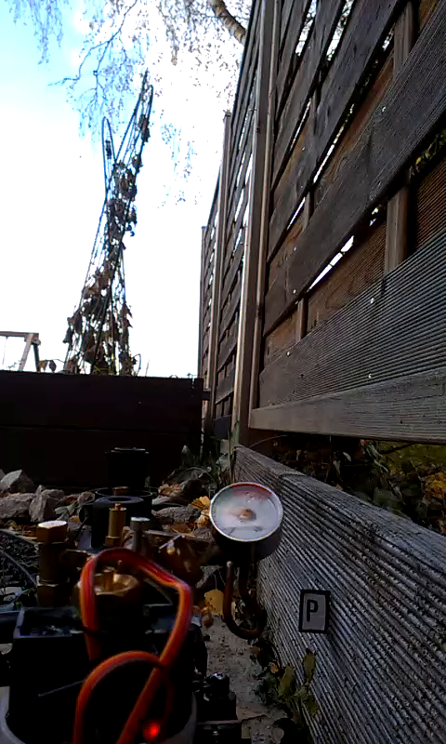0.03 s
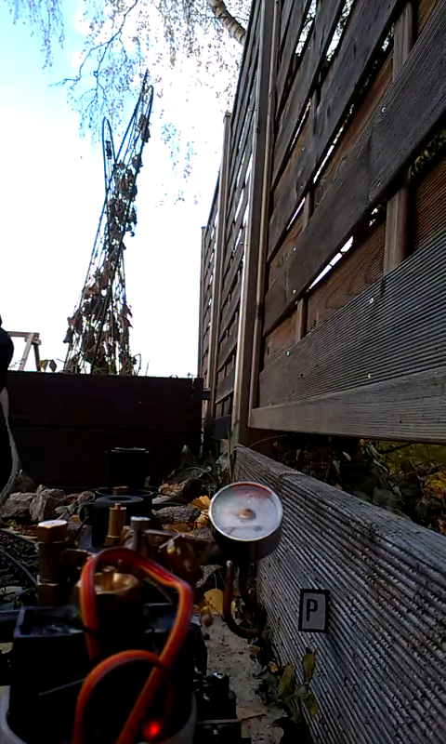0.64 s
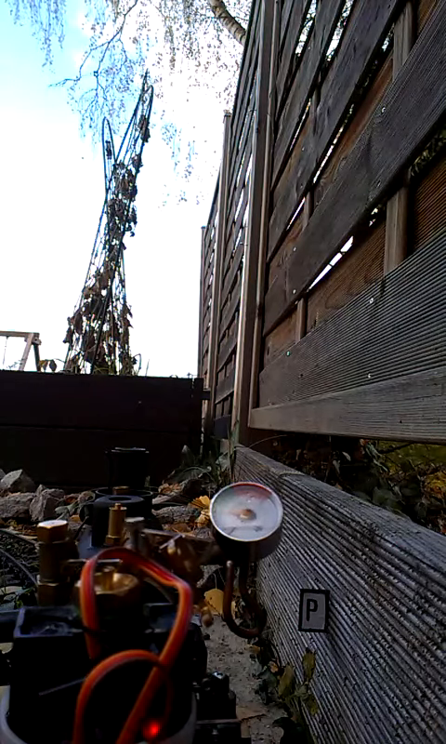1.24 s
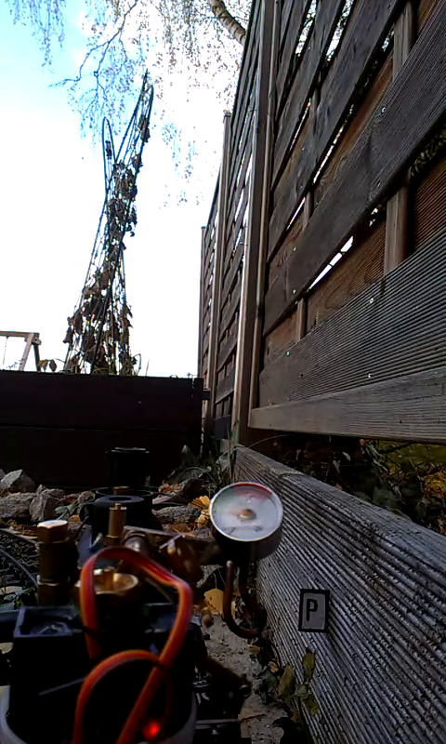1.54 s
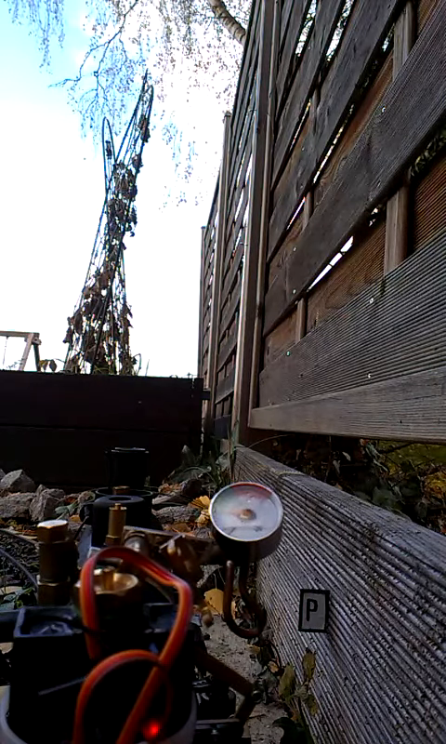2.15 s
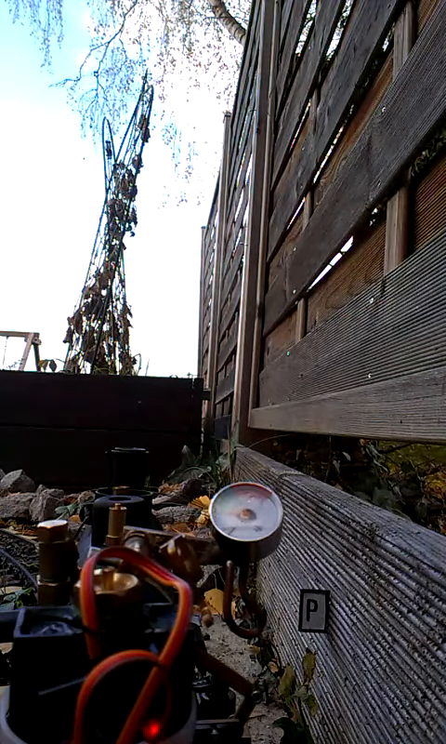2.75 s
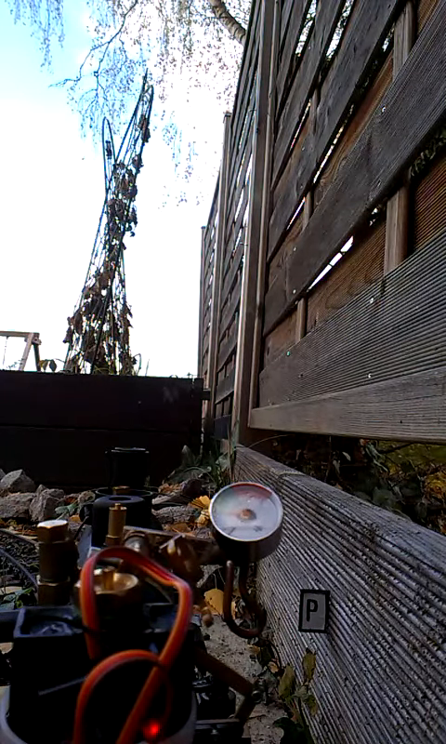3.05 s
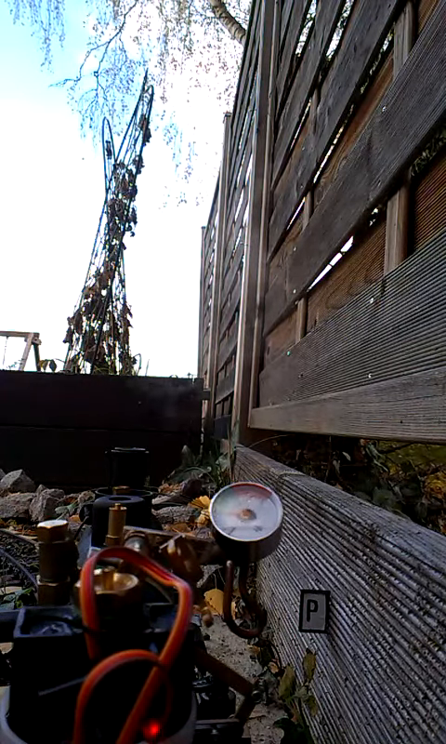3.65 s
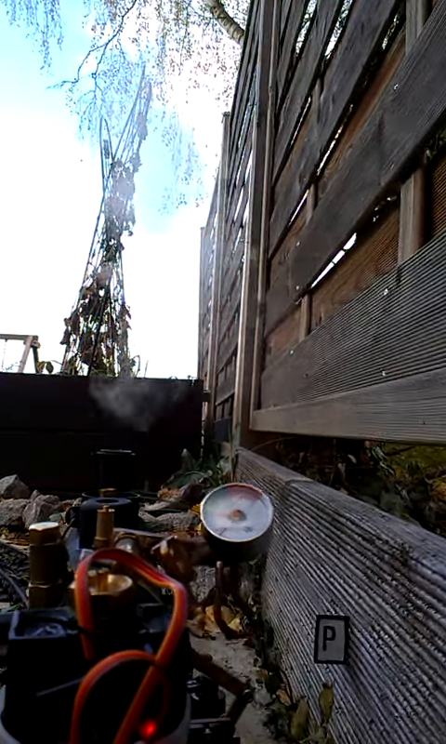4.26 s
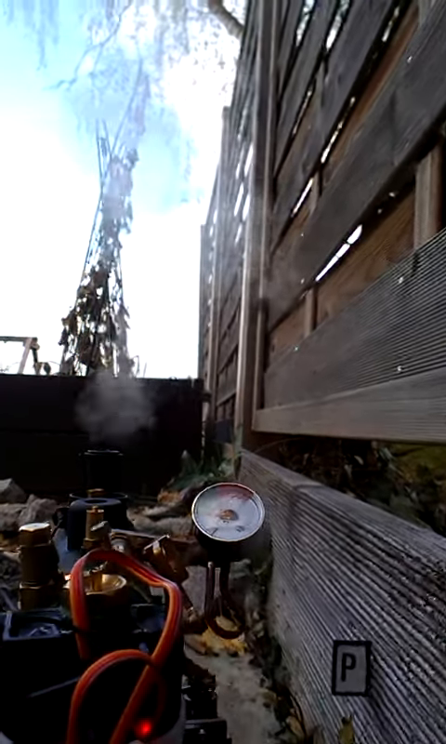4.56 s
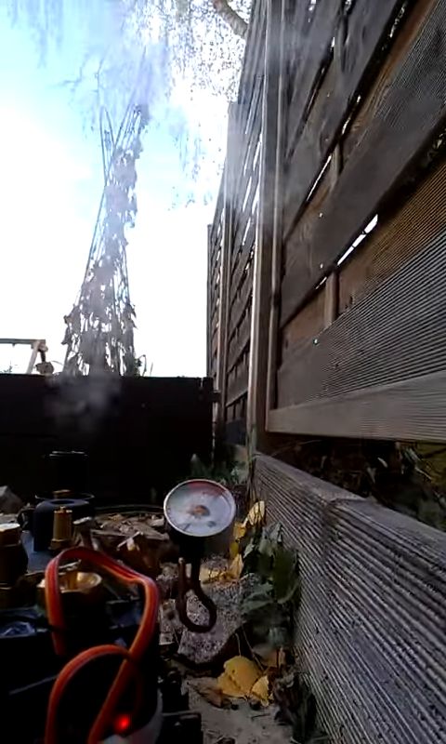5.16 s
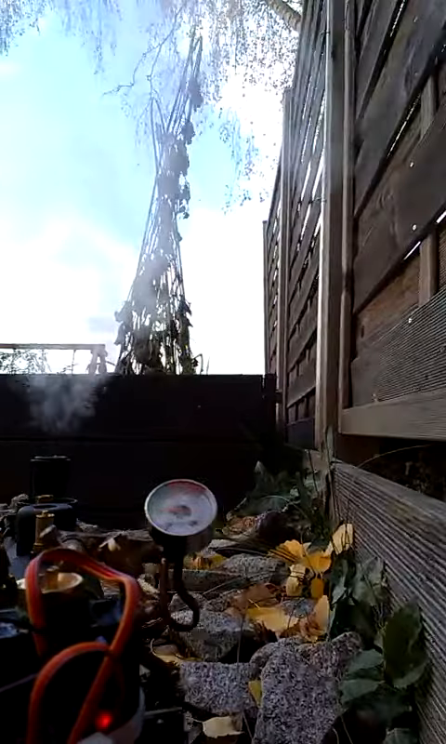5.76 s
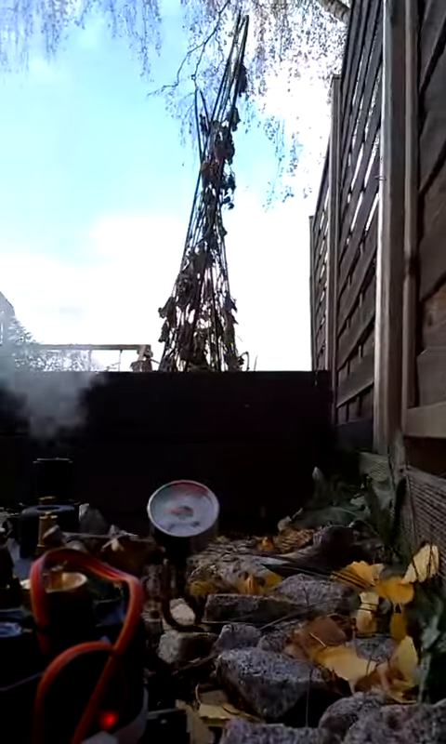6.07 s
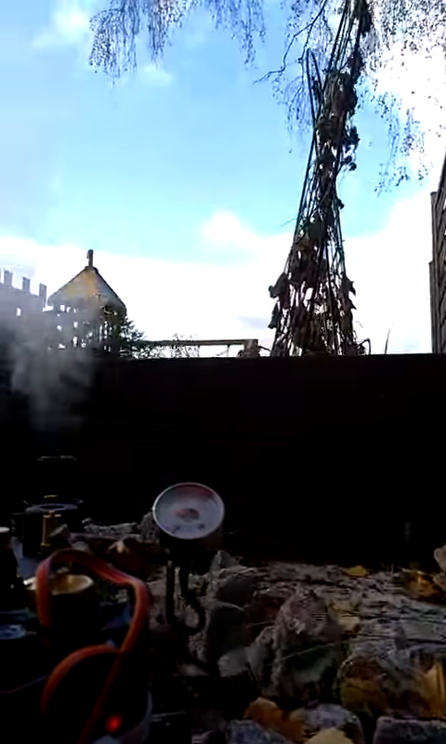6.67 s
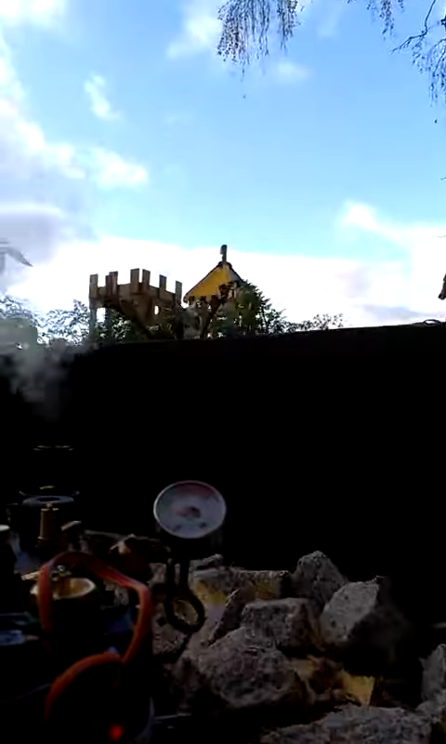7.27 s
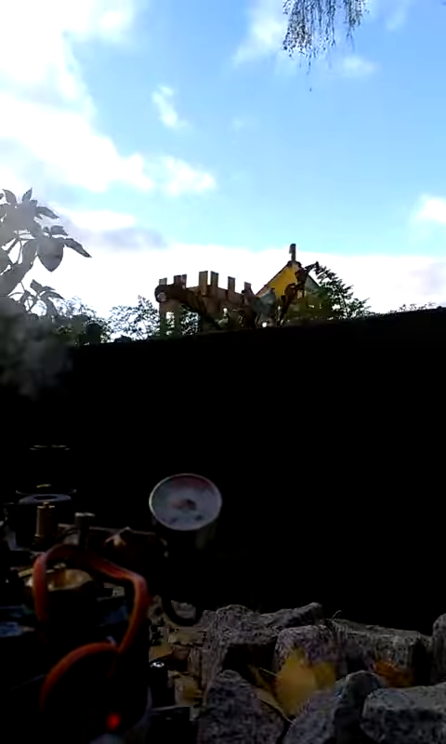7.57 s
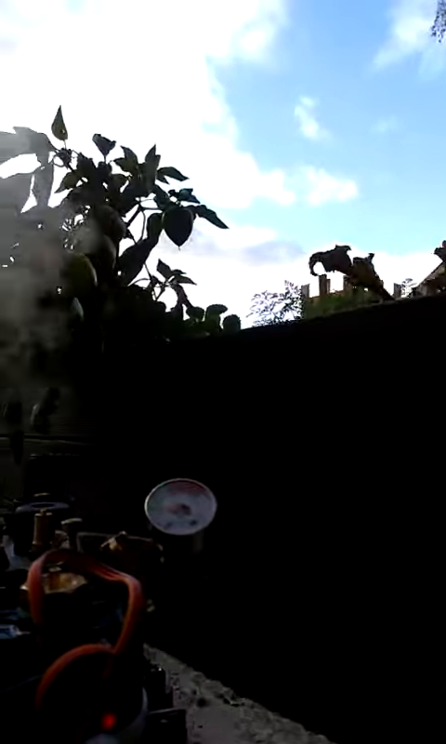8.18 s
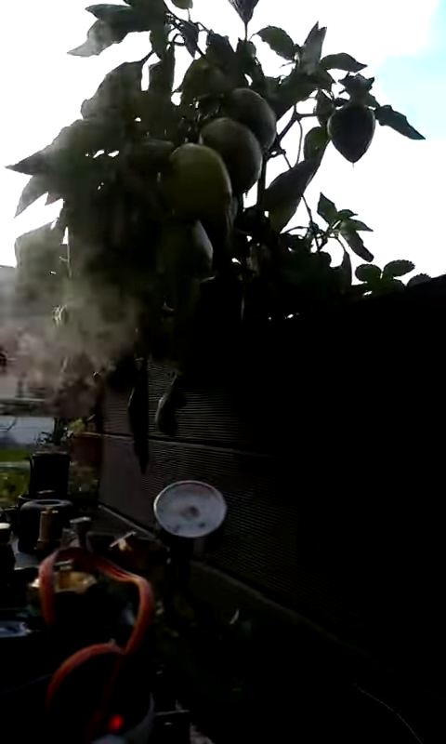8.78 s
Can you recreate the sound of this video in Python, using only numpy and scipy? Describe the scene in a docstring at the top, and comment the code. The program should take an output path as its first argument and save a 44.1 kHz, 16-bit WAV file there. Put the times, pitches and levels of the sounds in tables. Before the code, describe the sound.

Close gas flame flutter and spitting steam from a model locomotive, which pulls away with fast hissy chuffs and growing wheel rumble.

```python
"""A model steam locomotive in the open air, the microphone riding in its cab, close to the boiler.
The microphone comes on with a soft thump. The engine stands, its gas burner fluttering in the flue,
while wet steam sputters and spits, water thumps in the steam pipe and thin jets hiss.
Near four seconds it moves off, slipping at first: the exhaust beats quicken, and the wheels rumble
and knock up through the frame."""
import sys
import numpy as np
from scipy import signal
from scipy.fft import rfft, irfft
from scipy.io import wavfile
from scipy.ndimage import uniform_filter1d, map_coordinates

SR = 44100
rng = np.random.default_rng(int(sys.argv[2]) if len(sys.argv) > 2 else 0)


def bounce(signal):
    """Save signal as a 16-bit WAV file at the path given by the first command-line argument."""
    frames = np.transpose(np.atleast_2d(signal))
    limited = np.clip(frames, -1, 1)
    pcm = np.round(limited * 32767).astype(np.int16)
    wavfile.write(sys.argv[1], SR, pcm)


N = 397782
TIME = np.arange(N) / SR
FREQ = np.fft.rfftfreq(N, 1 / SR)

# resonances of the cab around the microphone: (frequency [Hz], width [Hz], lift [dB])
CAB_MODES = [(2124, 150, 15.5), (2274, 270, -17.5), (3200, 83, -15), (3900, 78, 5), (4000, 120, -13),
             (4720, 250, 3), (5160, 240, -11), (5290, 140, 10.5), (5660, 170, -9.5), (6020, 94, 7),
             (6450, 75, 1), (6770, 110, 4), (7260, 110, -1), (7990, 92, 8), (8880, 90, 1), (9130, 67, -8),
             (9490, 105, 6), (9700, 280, -5), (10300, 160, 4.5)]
# resonances of the frame beneath it: (frequency [Hz], width [Hz], lift [dB])
FRAME_MODES = [(60, 18, 2.5), (100.6, 43, 6), (316, 14, 4), (403, 30, -3.5), (468, 77, 2.5),
               (530, 13, -1.5), (598, 57, 7.5), (930, 25, -5), (1140, 65, 2), (1287, 23, -12),
               (1780, 200, -1), (1987, 91, 8), (3850, 180, 14.5)]


def gain_of(db):
    """Decibels to amplitude."""
    return 10 ** (np.asarray(db) / 20)


def unit_rms(x):
    """Scales to rms 1."""
    return x / np.sqrt(np.mean(x ** 2) + 1e-20)


def level(rows):
    """Gain from rows of (time [s], level [dB]), faded to silence outside their span."""
    times, db = np.transpose(rows)
    inside = (TIME >= times[0]) & (TIME <= times[-1] + .02)
    return gain_of(np.interp(TIME, times, db)) * uniform_filter1d(1. * inside, size=200)


def held(start, length, attack, release):
    """Envelope of a rush of steam or flame: it opens, holds and dies away."""
    opening = np.clip((TIME - start) / attack, 0, 1)
    return opening * np.exp(-np.maximum(TIME - start - length, 0) / release)


def wander(rate_hz):
    """Random motion of rms 1, rolled off above the rate."""
    return unit_rms(irfft(rfft(rng.standard_normal(N)) / np.sqrt(1 + (FREQ / rate_hz) ** 4), N))


def colour(x, spectrum, modes=()):
    """Causal filter of unit power gain: a (frequency [Hz], level [dB]) curve with resonances on top."""
    hz, db = np.transpose(spectrum)
    shape_db = np.interp(np.log(FREQ + 1), np.log(hz), db)
    for centre, width, lift in modes:
        shape_db += lift / (1 + (2 * (FREQ - centre) / width) ** 2)
    log_gain = np.log(unit_rms(gain_of(shape_db)))
    minimum_phase = -signal.hilbert(np.r_[log_gain, log_gain[-2:0:-1]]).imag[:len(FREQ)]
    impulse = irfft(np.exp(log_gain + 1j * minimum_phase), N)[:4096]
    return signal.oaconvolve(x, impulse)[:N]


def resonate(x, hz, width_hz):
    """A resonance of gain 1 that can follow a moving pitch."""
    carrier = np.exp(2j * np.pi * np.cumsum(hz * np.ones(len(x))) / SR)
    pole = np.exp(-np.pi * width_hz / SR)
    return 2 * (carrier * signal.lfilter([1 - pole], [1, -pole], x / carrier)).real


def add(mix, start, sound):
    """Mixes a sound in at a time."""
    part = mix[max(round(start * SR), 0):][:len(sound)]
    part += sound[:len(part)]


def crackle(per_s, spread_db, decay_s, rise_s=0.00038):
    """Noise in short bursts of uneven size: drops bursting in steam, or grit on a rail."""
    sizes = gain_of(spread_db * np.minimum(rng.exponential(1, N), 3.5))
    bursts = sizes * (rng.random(N) < per_s / SR)
    poles = np.exp(-2 / (np.array([decay_s, rise_s]) * SR))
    power = signal.lfilter([1], np.poly(poles), bursts ** 2)
    return unit_rms(np.sqrt(np.abs(power)) * rng.standard_normal(N))


def burner(singing_hz=1160):
    """The flame flutters and sounds the flue tube; the gas nozzle hisses faintly."""
    # flame in the flue, and gas at the nozzle: (frequency [Hz], level [dB])
    flue_spectrum = [(15, -47), (25, -16.5), (131, -14.5), (193, -13.5), (262, -11.5), (342, -15),
                     (605, -13), (790, -10), (875, -11.5), (1140, -0.5), (1320, -7.5), (1550, -21.5),
                     (3300, -52), (4290, -67), (7260, -120)]
    gas_spectrum = [(1940, -62), (3300, -21.5), (3760, -13), (4120, -15), (6320, -15), (6620, -7),
                    (6970, -3), (7490, -19), (15600, -39)]
    # resonances of the flue: (frequency [Hz], width [Hz], lift [dB])
    flue_modes = [(438, 84, 3.5), (614, 94, -4.5), (855, 29, 4.5), (1160, 58, 4.5), (1608, 14, 9),
                  (1720, 21, -6), (1930, 230, -8), (2170, 73, -5), (2290, 100, -5)]
    # flares that make the flue sing for an instant: (time [s], level [dB])
    flares = [(.109, -24), (.137, -24), (.635, -24), (.947, -24), (1.187, -25), (1.294, -24), (1.711, -25),
              (2.131, -24), (2.462, -21), (2.878, -21), (2.925, -22.5), (3.425, -21), (3.556, -19.5)]
    flutter = unit_rms(gain_of(2.2 * wander(rate_hz=18)))
    flame = colour(rng.standard_normal(N) * flutter, flue_spectrum, flue_modes)
    flaring = sum(gain_of(db) * held(start, .006, attack=.002, release=.004) for start, db in flares)
    singing = np.sin(2 * np.pi * np.cumsum(singing_hz + 50 * wander(rate_hz=86.7)) / SR)
    nozzle = colour(rng.standard_normal(N), gas_spectrum, CAB_MODES + [(6660, 200, 3)])
    return gain_of(-32) * flame + flaring * singing + gain_of(-58.5) * nozzle


def fittings(flutter_db=4.5):
    """Wet steam seeps and crackles at the fittings."""
    # the steady seep: (time [s], level [dB])
    seep_levels = [(.08, -54.5), (1.6, -60.5), (1.9, -62), (2.4, -66), (2.9, -60), (3.9, -56), (4.6, -54),
                   (5.0, -51), (5.5, -51.5), (6.4, -49.5), (7.4, -55.5), (8.0, -58.5), (9.02, -51.5)]
    # sputtering on top of it: (start [s], length [s], level [dB])
    bouts = [(.245, 0.25, -53.5), (.64, .14, -52.5), (0.796, 0.12, -57), (1.06, 0.049, -53.5),
             (1.622, .06, -55), (2.483, 0.072, -47.5), (2.983, 0.18, -53.5), (3.3, 0.33, -54.5),
             (3.73, 0.095, -45.5), (4.29, 0.033, -46), (5.964, .08, -52), (6.103, .07, -48),
             (8.5, .03, -45.5), (8.768, 0.019, -45.5)]
    # wet steam: (frequency [Hz], level [dB])
    wet_spectrum = [(1200, -1), (2100, -4.5), (2600, -7), (3300, -11.5), (4600, -7), (6400, -1),
                    (9000, -1.5), (10400, -5), (11300, -12), (15500, -15)]
    drops = crackle(per_s=300, spread_db=3.5, decay_s=0.0024, rise_s=0.00045)
    wet = drops + gain_of(-4) * rng.standard_normal(N)
    seep = level(seep_levels) * unit_rms(gain_of(flutter_db * wander(rate_hz=6.4)))
    sputter = sum(gain_of(db) * held(start, length, attack=0.0087, release=0.005)
                  for start, length, db in bouts)
    return gain_of(5.5) * colour(wet * np.hypot(seep, sputter), wet_spectrum, CAB_MODES)


def spits(ring_decay_s=0.0042, snap_decay_s=.0003):
    """Single drops burst on hot metal: a snap and a brief ring. Small, high drops snap hardest."""
    # drops of water: (time [s], level [dB], pitch [Hz])
    drops = [(.165, -31, 4000), (.21, -33, 3600), (.7198, -30, 9480), (0.837, -32, 6840),
             (1.032, -26, 4400), (1.038, -32, 5360), (1.1947, -30, 7750), (1.507, -25.5, 7440),
             (1.805, -28.5, 3570), (1.8488, -31, 6700), (2.5244, -27, 6600), (2.6, -32, 6520),
             (2.7, -28, 4900), (2.772, -29, 4900), (2.93, -27, 4700), (2.9955, -27.5, 8660),
             (3.394, -24, 4700), (3.9627, -33, 4800), (4.2415, -27, 7910), (8.523, -22, 6200)]
    t = np.arange(SR // 30) / SR
    snaps, rings = np.zeros(N), np.zeros(N)
    for start, db, hz in drops:
        burst = gain_of(db) * rng.standard_normal(len(t))
        add(snaps, start, burst * np.exp(-t / snap_decay_s) * (hz / 9000) ** 2)
        add(rings, start, resonate(burst * np.exp(-t / ring_decay_s), hz, width_hz=hz / 6))
    ring_spectrum = [(1500, 12.5), (3500, -8), (10500, -0.5), (14000, -16)]
    return gain_of(-11) * snaps + gain_of(10) * colour(rings, ring_spectrum, CAB_MODES)


def thumps(gush_decay_s=0.0029, ring_hz=790, ring_s=0.0028):
    """Slugs of water strike inside the steam pipe: a dull clunk in a short gush."""
    # strikes of water: (time [s], level [dB])
    slugs = [(.2435, -23.5), (.8355, -22.5), (2.4135, -28), (2.4215, -14.5), (2.429, -20), (2.439, -28)]
    t = np.arange(SR // 25) / SR
    clunk = t / ring_s * np.exp(1 - 2 * t / ring_s) * np.sin(2 * np.pi * ring_hz * t)
    gushes, clunks = np.zeros(N), np.zeros(N)
    for start, db in slugs:
        add(gushes, start, gain_of(db) * rng.standard_normal(len(t)) * np.exp(-t / gush_decay_s))
        add(clunks, start, gain_of(db) * clunk)
    gush_spectrum = [(200, -42), (520, -8), (800, -2.5), (1100, 14.5), (1500, 1.5), (2200, -12.5),
                     (3500, -23), (9000, -20), (15000, -49)]
    return gain_of(1) * colour(gushes, gush_spectrum, CAB_MODES) + gain_of(5.5) * clunks


def jets(swell_db=8):
    """Now and then a thin jet of dry steam swells and flutters through a narrow gap, almost whistling."""
    # escapes of steam: (start [s], length [s], level reached [dB], pitch [Hz])
    escapes = [(1.212, 0.066, -38, 7000), (1.307, .1, -37.5, 7050), (1.442, 0.26, -36.5, 7100),
               (4.496, 0.14, -26.5, 7550), (4.69, 0.049, -35, 7500), (7.304, .13, -29, 7640)]
    # dry steam: (frequency [Hz], level [dB])
    jet_spectrum = [(4500, -6), (6000, -1.5), (6600, 2), (8200, -4), (9300, -5), (14000, -1)]
    flow = rng.standard_normal(N) * gain_of(2.6 * wander(rate_hz=52))
    hiss = np.zeros(N)
    for start, length, db, hz in escapes:
        whistle = unit_rms(resonate(resonate(flow, hz, width_hz=1400), hz, width_hz=1900))
        swell = gain_of(db - swell_db * np.clip(1 - (TIME - start) / length, 0, 1) ** 2)
        hiss += whistle * swell * held(start, length, attack=0.0085, release=0.015)
    return gain_of(-4) * colour(hiss, jet_spectrum)


def cylinder_leak():
    """Steam leaks at the cold cylinders, in gulps between plugs of water."""
    # strength of the leak: (time [s], level [dB])
    leak_levels = [(2.41, -35), (2.48, -47.5), (2.6, -53.5), (3.5, -53.5), (3.85, -50), (3.96, -38),
                   (4.2, -43), (4.55, -36), (4.9, -45), (5.12, -38), (5.36, -50.5)]
    # its hiss: (frequency [Hz], level [dB])
    leak_spectrum = [(1500, -2), (2100, -11), (3200, -15), (4100, -6), (4400, 0.5), (4650, 3), (5000, -6.5),
                     (5500, -5.5), (5800, -12.5), (6500, -9.5), (8000, -4), (9300, -11), (12000, -27)]
    leak_modes = [(4650, 300, 2.6), (5430, 140, 1.8), (7900, 190, 0.94)]
    gulps = unit_rms(gain_of(1.4 * wander(rate_hz=8.9)))
    gurgle = crackle(per_s=320, spread_db=4, decay_s=0.0078) * gulps
    return gain_of(4) * colour(gurgle * level(leak_levels), leak_spectrum, CAB_MODES + leak_modes)


def wheel_speed():
    """Turns per second at every instant."""
    # the driving wheels: (time [s], speed [turns/s])
    speeds = [(3.75, 0.0), (3.9, 1.699), (4.3, 1.971), (4.8, 1.646), (5.2, 1.713), (5.5, 2.627),
              (6.1, 2.755), (6.5, 3.619), (7.1, 4.108), (7.45, 4.481), (8.3, 4.176), (9.0, 4.002)]
    return np.interp(TIME, *np.transpose(speeds))


def beats(uneven_db=2.5):
    """The valves of two cylinders open four times a turn: rows of (time [s], pipe [dB], fizz [dB])."""
    # where the valves open: (place in the turn [turns])
    places = [.167, .415, .65, .833]
    # strength of those four beats: (accent [dB])
    accents = [.5, -1, -1, -3.5]
    # force of the exhaust: (time [s], pipe level [dB], fizz level [dB])
    blast_levels = [(3.9, -32.5, -41), (4.7, -33, -36), (5.3, -39, -36), (5.7, -34, -35.5),
                    (6.1, -34.5, -34.5), (6.55, -33.5, -34), (7.4, -33.5, -33.5), (7.75, -34, -40),
                    (9.0, -35, -38.5)]
    times, pipe_db, fizz_db = np.transpose(blast_levels)
    turns = np.cumsum(wheel_speed()) / SR
    rows = []
    for turn in range(int(turns[-1]) + 1):
        for place, accent_db in zip(places, accents):
            start = np.searchsorted(turns, turn + place) / SR
            pipe_lift, fizz_lift = accent_db + uneven_db * rng.standard_normal(2)
            rows.append((start, np.interp(start, times, pipe_db) + pipe_lift,
                         np.interp(start, times, fizz_db) + fizz_lift))
    return rows


def exhaust(rise_s=0.011):
    """Each beat opens, rings the blast pipe and dies away; water in it gives each fizz its own pitch."""
    # stray spurts as the cylinders clear: (time [s], pipe level [dB], fizz level [dB])
    spurts = [(2.415, -29, -32), (2.536, -33.5, -43), (3.248, -36, -43), (3.299, -34, -44),
              (3.355, -35, -35), (3.51, -33, -41), (3.801, -33.5, -33), (4.196, -46, -42),
              (4.525, -38, -27)]
    # the blast pipe, and the higher fizz: (frequency [Hz], level [dB])
    pipe_spectrum = [(2500, -12.5), (3600, -11), (4500, 5), (5600, 4), (6300, -5), (8000, -25),
                     (12000, -42)]
    fizz_spectrum = [(5000, -20), (6500, 2.5), (8200, 1.5), (9500, -2), (11500, -24), (15500, -17)]
    # resonances of the blast pipe: (frequency [Hz], width [Hz], lift [dB])
    pipe_modes = [(4595, 150, 5), (5140, 250, -14), (5400, 190, 6)]
    t = np.arange(SR // 6) / SR
    opening = np.minimum(t / rise_s, 1) ** 2
    puffs, fizz = np.zeros(N), np.zeros(N)
    for start, pipe_db, fizz_db in spurts + beats():
        # beats lengthen as the engine moves off, then shorten at speed
        stretch = np.interp(start, [3.5, 4.2, 6.5, 7.8], [0.5, 2.3, 2.8, 1.13]) * rng.uniform(0.39, 2.05)
        age = np.maximum(t - 1.1 * rise_s, 0) / stretch
        spray = rng.standard_normal(len(t))
        ring = unit_rms(resonate(spray, rng.uniform(7400, 10800), width_hz=900))
        spray += .5 * gain_of(-4) * ring
        add(puffs, start - rise_s / 2, gain_of(pipe_db) * opening * np.exp(-age / 0.01))
        add(fizz, start - rise_s / 2, gain_of(fizz_db) * opening * np.exp(-age / 0.0084) * spray)
    spatter = unit_rms(gain_of(4.9 * wander(rate_hz=370)))
    pipe = colour(puffs * rng.standard_normal(N), pipe_spectrum, pipe_modes)
    return gain_of(-1.3) * pipe + gain_of(-5) * colour(fizz * spatter, fizz_spectrum, CAB_MODES)


def wheels(cruise_turns_per_s=4):
    """Rough rails and grit shake the frame, which colours the rumble; all of it grows with speed."""
    # the wheels slip at first: (time [s], share of their speed that moves the engine [0-1])
    grip = [(3.8, 0.39), (4.8, 1)]
    # rough track: (middle [s], half length [s], rumble lift [dB], boom lift [dB], roar lift [dB])
    rough_track = [(4.56, 0.11, 2, -16, 7), (4.84, 0.14, 4, 5, -2), (5.156, 0.17, 4, -0.5, 5.5),
                   (5.442, 0.1, 5, 1.5, 0), (5.86, 0.3, 3.5, 5.5, 1), (6.197, 0.17, 0.5, 1, 2.5),
                   (6.9, 0.11, 2, 2.5, 1.5), (7.15, 0.11, -2.5, -1, 1), (7.278, 0.035, 12, 5.5, 0),
                   (7.55, 0.035, 3, 9, -0.5), (7.703, 0.12, 4.5, 1, -3.5), (8.787, 0.081, 6.5, -1, 0.5)]
    # the boom along the track: (time [s], pitch [Hz])
    boom_pitches = [(3.9, 190), (4.15, 189), (4.35, 146), (4.8, 187), (5.3, 167), (5.8, 203), (6.1, 195),
                    (6.5, 183), (7.0, 191), (7.5, 176.5), (9.0, 193)]
    # rumble of the rails, and roar of the grit: (frequency [Hz], level [dB])
    rumble_spectrum = [(15, -51), (30, -10), (55, -2), (100, -5.5), (135, -4.5), (220, -14.5), (400, -16),
                       (800, -76)]
    roar_spectrum = [(150, -19.5), (300, -2.5), (500, -1), (720, 0), (900, -2), (1150, -0.5), (1420, -5.5),
                     (1750, -24.5), (2200, -29.5), (3200, -45.5), (4300, -38.5), (9000, -74)]
    travel_speed = wheel_speed() * np.interp(TIME, *np.transpose(grip))
    doublings = np.log2(travel_speed / cruise_turns_per_s + 1e-6)
    rumble_lift, boom_lift, roar_lift = sum(np.outer(lifts, np.exp(-((TIME - middle) / half) ** 2))
                                            for middle, half, *lifts in rough_track)
    sway = gain_of(2 * wander(rate_hz=21))
    rumble = sway * rng.standard_normal(N) * gain_of(-32.5 + 6 * doublings + rumble_lift)
    boom_hz = np.interp(TIME, *np.transpose(boom_pitches))
    boom = resonate(resonate(rng.standard_normal(N), boom_hz, width_hz=37), boom_hz, width_hz=133)
    boom = unit_rms(boom) * sway * gain_of(-26 + 9 * doublings + boom_lift)
    grit = crackle(per_s=900, spread_db=2.5, decay_s=0.0026) + rng.standard_normal(N)
    roar = unit_rms(grit) * gain_of(-18 + 16 * doublings + roar_lift)
    return colour(rumble, rumble_spectrum, FRAME_MODES) + boom + colour(roar, roar_spectrum, FRAME_MODES)


def knocks(ring_decay_s=0.0035, crack_decay_s=0.0049, bump_hz=185, bump_decay_s=0.01):
    """Wheels and rods knock: a short metal clunk and a crack, while the whole frame gives a low bump."""
    # impacts: (time [s], level [dB], ring pitch [Hz], crack offset [dB])
    impacts = [(4.609, -13.5, 760, -23), (4.64, -14, 630, -21), (5.189, -9.5, 1140, -27),
               (5.427, -8, 595, -21), (6.656, -11.5, 555, -10.5), (6.919, -4, 1070, -9.5),
               (7.033, -1.5, 680, -37), (7.053, -3, 1190, -14.5), (7.29, 0, 650, -23),
               (7.721, -7, 513, -14.5), (7.747, -9, 614, -15), (7.96, -7, 500, -17)]
    t = np.arange(SR // 12) / SR
    ring_envelope = np.exp(-t / ring_decay_s) * (1 - np.exp(-t / 0.00089))
    bump = gain_of(-12) * np.sin(2 * np.pi * bump_hz * t) * np.exp(-t / bump_decay_s)
    clunks, cracks = np.zeros(N), np.zeros(N)
    for start, db, hz, crack_db in impacts:
        add(clunks, start, gain_of(db) * (np.sin(2 * np.pi * hz * t) * ring_envelope + bump))
        crack = rng.standard_normal(len(t)) * np.exp(-t / crack_decay_s)
        add(cracks, start, gain_of(db + crack_db) * crack)
    crack_spectrum = [(150, -11), (600, -28), (1400, 21), (2000, 5), (3000, -10), (4000, -7),
                      (6000, -14), (14000, -41)]
    return clunks + gain_of(3) * colour(cracks, crack_spectrum, FRAME_MODES)


def plume():
    """Steam keeps rising from the chimney between beats: a soft, broad hiss."""
    # flow from the chimney: (time [s], level [dB])
    plume_levels = [(5.3, -67), (5.55, -43), (5.85, -51), (5.97, -37.5), (6.25, -48), (7.3, -44),
                    (7.7, -46), (9.0, -52)]
    flow = crackle(per_s=1000, spread_db=0.5, decay_s=0.0031) * level(plume_levels)
    return colour(flow, [(2000, -10), (3200, -9), (3900, 3), (4600, 0.5), (6000, -0.5), (8000, -0.5),
                         (10000, -19), (12000, -20)])


def surroundings(x, passing_share=0.68):
    """Adds steady echoes from close by and, once the engine rolls, a shifting one from passing stones."""
    # echoes of boiler, cab floor and fence: (delay [s], share [ratio])
    echoes = [(.0031, 0.039), (.0094, -0.22), (0.0146, .16)]
    near = sum(share * np.interp(TIME - round(delay * SR) / SR, TIME, x) for delay, share in echoes)
    rolling = np.interp(TIME, [4.8, 5.6], [0, 1])
    passing_delay_s = 0.001081 + 0.000162 * wander(rate_hz=3.85)
    passing = map_coordinates(x, [(TIME - passing_delay_s) * SR], order=3)
    return (x + near + passing_share * rolling * passing) * gain_of(-2.1 - 1.9 * rolling)


def scene():
    """Mono, from the cab: every source rides along at a constant distance from the microphone."""
    hisses = fittings() + cylinder_leak() + plume() + jets() + exhaust() + spits()
    return (burner() + surroundings(hisses) + wheels() + knocks() + thumps())[None]


def record(dry, ceiling_db=-3.5, cutoff_hz=15800):
    """The microphone comes on with a soft thump as its bias settles; the hardest knocks are rounded."""
    switch_on = np.interp(TIME, [.078, .08], [.003, 1])
    bias = gain_of(-29.5) * np.exp(-TIME / 0.25)
    heard = (dry + bias) * switch_on
    rounded = heard / (1 + (heard / gain_of(ceiling_db)) ** 10) ** (1 / 10)
    lowpass = signal.firwin(511, cutoff_hz, window=("kaiser", 9), fs=SR)
    return signal.oaconvolve(rounded, lowpass[None], "same")


dry = scene()
out = record(dry)
bounce(out)
```